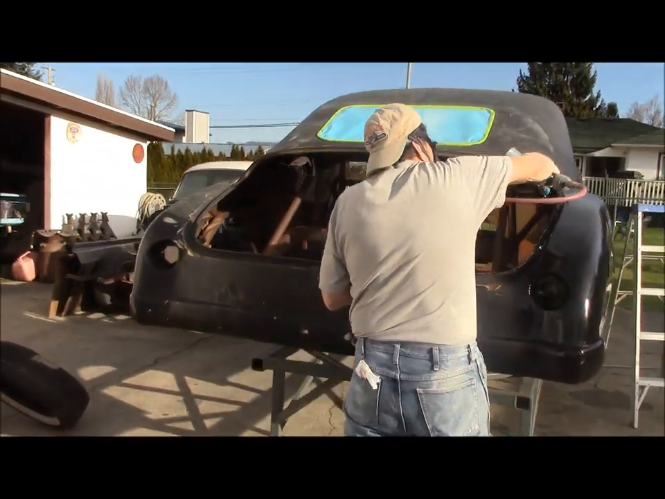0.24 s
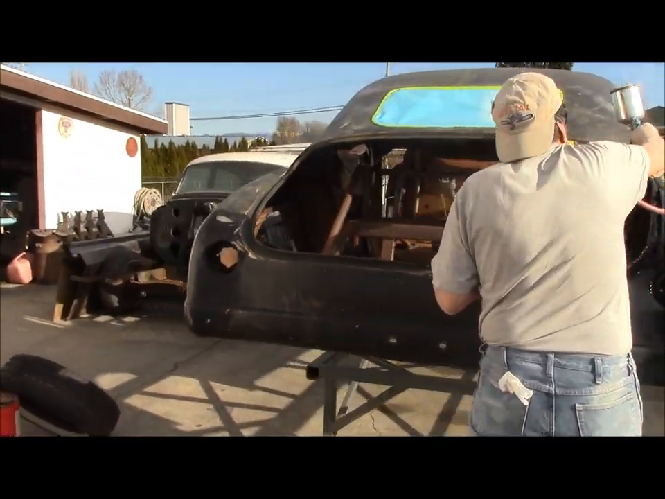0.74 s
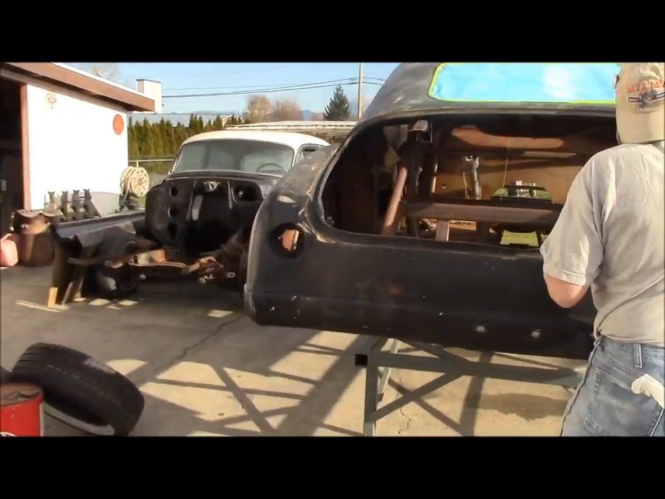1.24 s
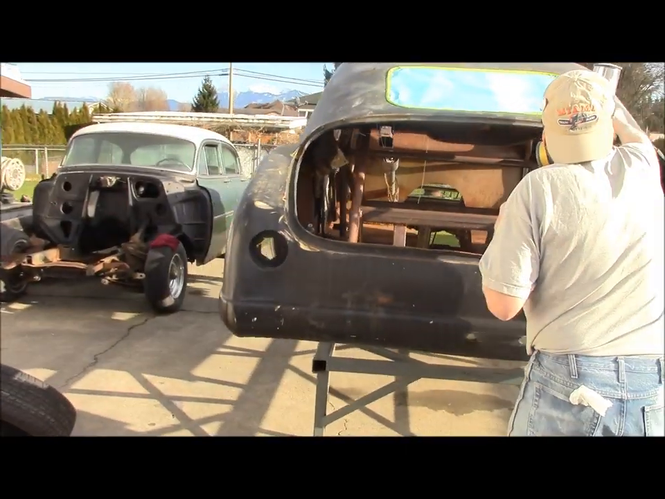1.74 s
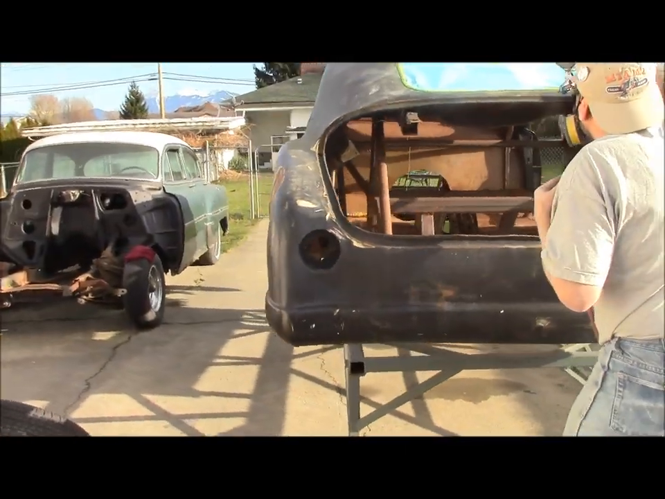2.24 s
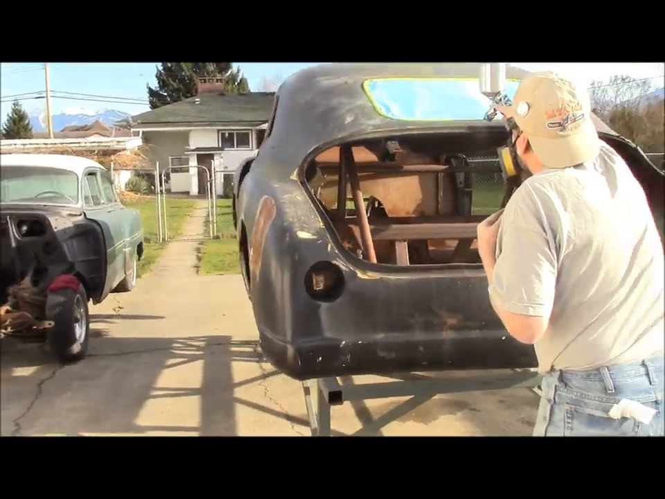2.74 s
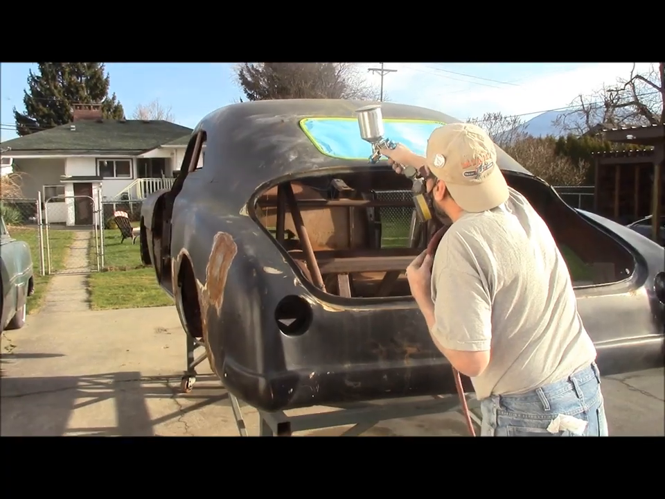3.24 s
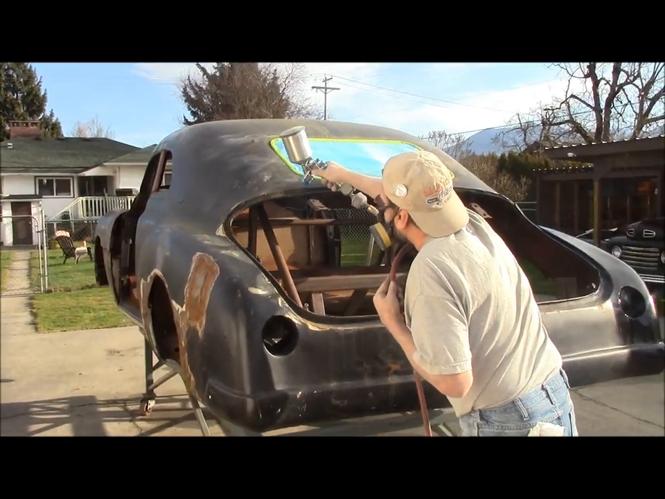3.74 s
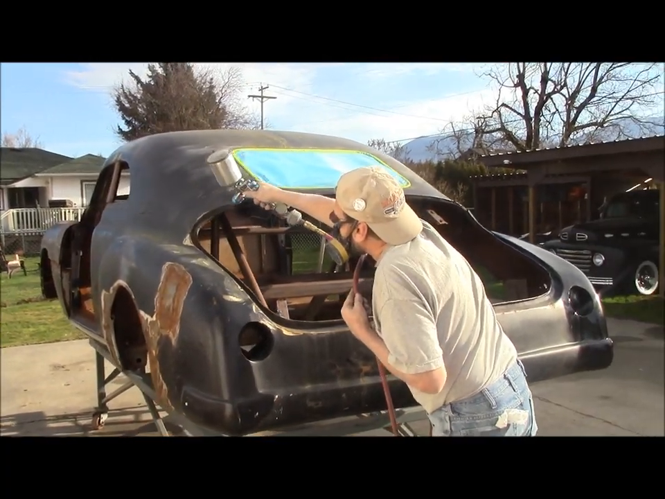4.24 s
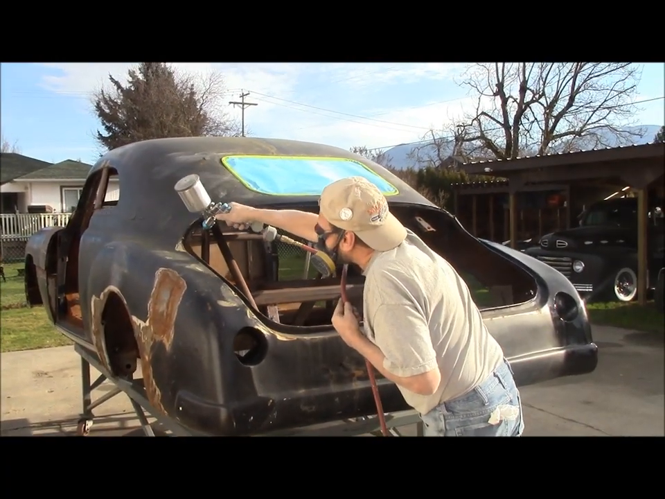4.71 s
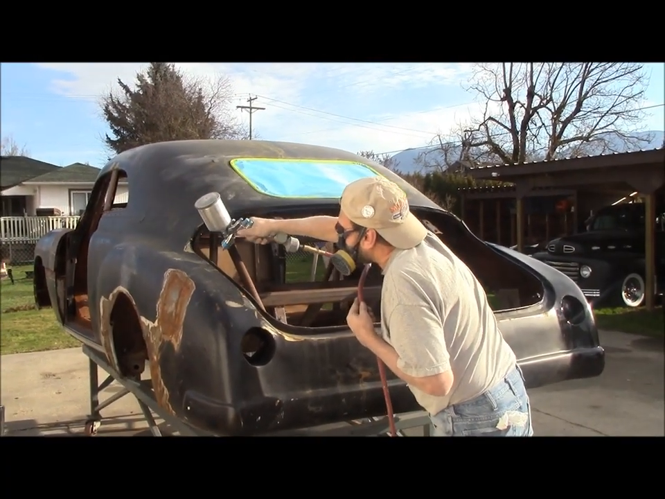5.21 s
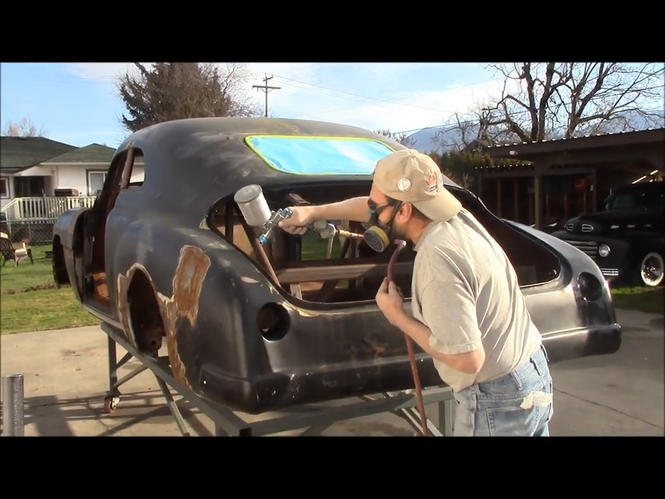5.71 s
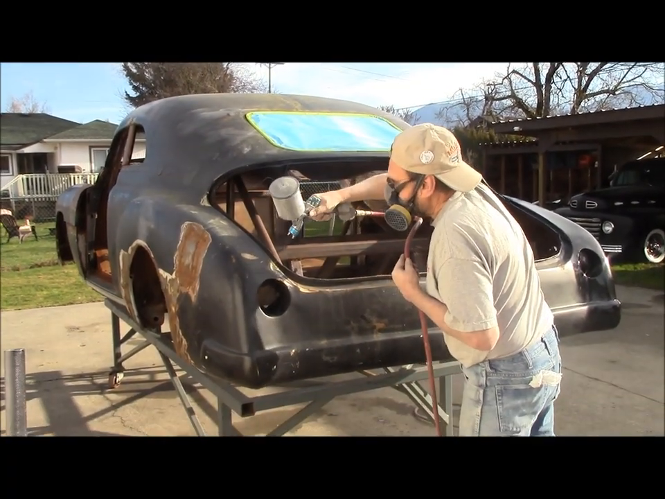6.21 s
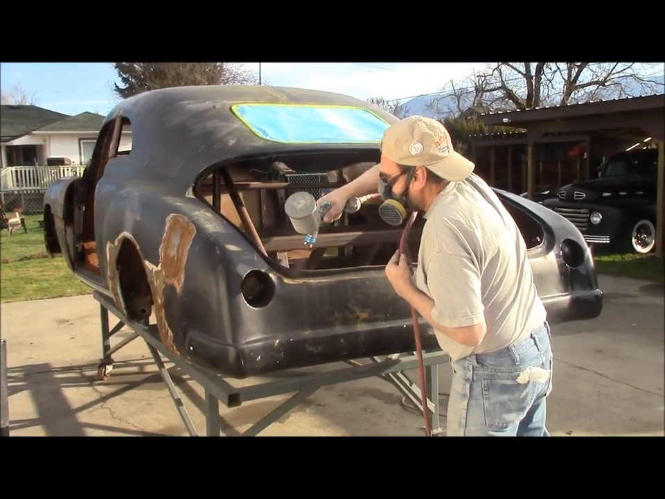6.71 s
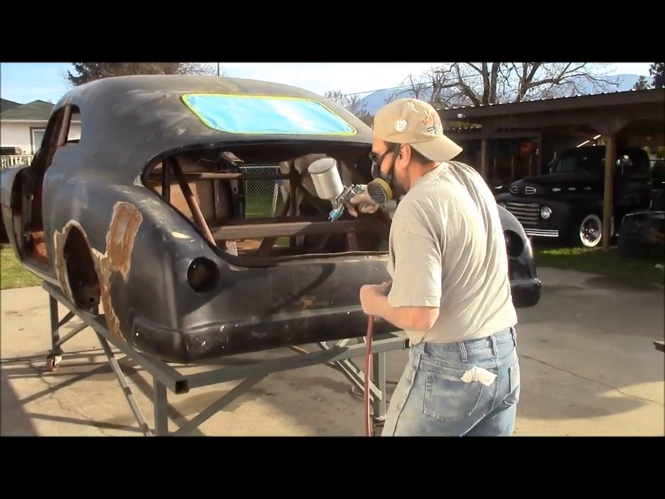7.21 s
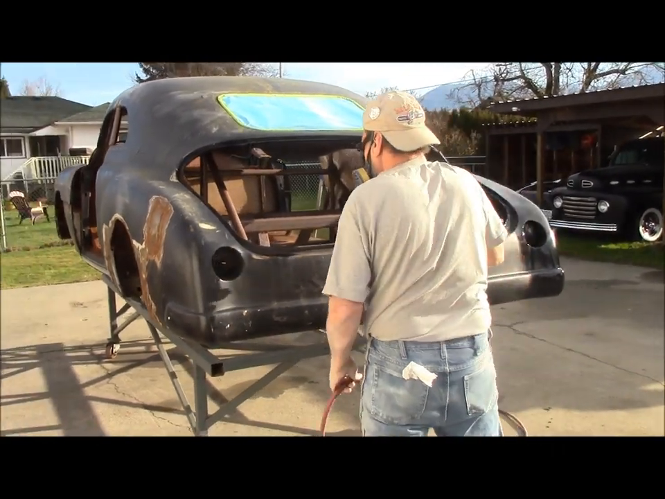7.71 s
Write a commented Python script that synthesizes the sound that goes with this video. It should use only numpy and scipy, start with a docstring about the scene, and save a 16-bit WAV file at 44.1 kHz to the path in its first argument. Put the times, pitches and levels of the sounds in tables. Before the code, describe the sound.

Outdoors, an air-fed spray gun hisses, pauses briefly, then hisses on and grows much louder before snapping off, over a droning compressor and early wind puffs.

```python
"""Spray painting in an open yard

An air-fed spray gun paints a car shell; the trigger is let go twice. Its hiss is filtered noise, with echoes off
the steel panels as the gun moves. A compressor drones behind it: sine tones plus a clatter repeated each stroke.
After a slight dip the gun, compressor, open air and a roar like a nearing vehicle grow louder together.
Puffs of wind flutter the microphone at first (short dull pops); shoes scuff on concrete (noise), with one squeak."""
import sys
import numpy as np
from scipy import signal
from scipy.fft import rfft, irfft
from scipy.io import wavfile
from scipy.ndimage import map_coordinates

SR = 44100
rng = np.random.default_rng(int(sys.argv[2]) if len(sys.argv) > 2 else 0)


def persist_wave(psi):
    """Save psi, clipped to +-1, as 16-bit WAV."""
    counts = np.round(np.clip(psi, -1, 1) * 32767).astype(np.int16)
    wavfile.write(sys.argv[1], SR, np.atleast_2d(counts).T)


N = 351036  # samples
TIME = np.arange(N) / SR  # s
FREQS = np.maximum(np.fft.rfftfreq(N, 1 / SR), 1)  # Hz


def undb(db):
    """Turn decibels into a plain multiplier."""
    return 10 ** (np.asarray(db) / 20)


def unit(x):
    """Scale to an average (rms) level of 1."""
    return x / np.sqrt(np.mean(x ** 2))


def curves(rows):
    """Join each column of a table by straight lines in time; the first column is the time."""
    times, *columns = np.transpose(rows)
    return [np.interp(TIME, times, column) for column in columns]


def colour(points):
    """Multiplier at every frequency, joined up from (f/Hz, level/dB) points."""
    hz, db = np.transpose(points)
    return undb(np.interp(np.log(FREQS), np.log(hz), db))


def resonance(hz, width):
    """Response of something that rings at one pitch, 1 at its centre."""
    return 1 / (1 + 1j * (FREQS ** 2 - hz ** 2) / (FREQS * width))


def above(hz, order=8):
    """Response that keeps what lies above hz; a higher order cuts more steeply."""
    return 1 / np.sqrt(1 + (hz / FREQS) ** (2 * order))


def shape(x, response):
    """Filter a sound by a frequency response."""
    return irfft(rfft(x) * response, N)


def noise(response):
    """Random noise coloured by a response, at rms 1."""
    spectrum = rng.standard_normal(2 * len(FREQS)).view(complex)
    return unit(irfft(response * spectrum, N))


def walk(rate):
    """A smooth random curve of spread 1 that turns about rate times a second."""
    return noise(np.exp(-(FREQS - 1) / rate))


def delayed(x, ms):
    """The sound after a path whose length may change."""
    fine = signal.resample_poly(x, 2, 1)
    positions = 2 * (np.arange(N) - ms * SR / 10 ** 3)
    return map_coordinates(fine, [positions], order=3, mode="mirror")


def spread(mid, side):
    """Make left and right from what they share and what sets them apart."""
    return np.array([mid + side, mid - side])


# Trigger pulls: opens t/s, closes t/s, relative level/dB, extra level of the stored hose pressure/dB
PULLS = [(-.5, 0.659, -0.5, 2), (1.116, 7.23, 0, 11)]


def trigger(open_s=0.0045, close_s=0.011, bleed_s=0.037, spit_db=-2, spit_s=0.0045):
    """Air flow: the valve spits as it cracks, then opens on a full hose whose surplus pressure bleeds away."""
    flow, spit_lead_s = 0, .0185
    for start, stop, db, surge_db in PULLS:
        age = np.maximum(TIME - start, 0)
        opening = 1 - np.exp(-age / open_s)
        closing = np.exp(-np.maximum(TIME - stop, 0) / close_s)
        cracked = np.maximum(TIME - start + spit_lead_s, 0) / spit_s
        spit = undb(spit_db) * 2 * cracked * np.exp(-cracked ** 2)
        pressure = undb(db + surge_db / (1 + (age / bleed_s) ** 3))
        flow = flow + spit + opening * closing * pressure
    return flow


# Colour of the jet's noise: f/Hz, relative level per Hz/dB
JET_COLOUR = [(650, -18), (1100, -11.5), (1550, -11), (2400, -4.5), (3150, -5), (3600, -3.5), (4250, -6),
              (5300, -3.5), (6500, -1.6), (8300, -4.5), (9200, -3), (10400, -3), (12300, -7),
              (13700, -11.7), (15100, -16)]
# Shared loudness of gun, compressor, open air and roar: t/s, level/dB
SWELL = [(.2, -33.5), (.62, -34.5), (1.3, -36.5), (4.49, -24), (4.55, -22.5), (5.06, -21.5), (5.18, -20),
         (5.47, -19), (6.05, -14), (6.66, -14), (6.79, -14.5), (7.2, -13)]
# How squarely the nozzle is heard, poorly while the painter's back is in the way:
# t/s, level of the beamed treble before the whole jet is evened out/dB
AIM = [(.3, -2), (.65, -0.5), (1.8, -3), (2.45, 2.5), (4.5, 3), (5.25, 5), (5.55, 4), (6.1, 3.5), (6.85, 1),
       (7.2, 4)]
# Low rush under the hiss, strongest as the jet blows across the rim: t/s, level before evening out/dB
RUSH = [(.3, -9), (1.4, -12), (2.6, -10.5), (3.8, -10.5), (4.6, -9), (5.2, -7.5), (5.6, -5), (5.9, -9.5),
        (6.25, -11.5), (6.7, -10), (7.2, -9.5)]
# Highest treble at the faintest moment (dB), and its change for each dB of swell: it lags as the jet grows
HIGHEST_DB, HIGHEST_PER_DB = 0.5, -0.0681


def jet(flutter_db=0.59, rush_hz=3400, beam_hz=8500, shade_hz=12800):
    """Churning air at the nozzle makes noise; the treble depends most on how the gun is aimed."""
    swell_db, aim = curves(SWELL)[0], undb(curves(AIM)[0])
    highest_db = HIGHEST_DB + HIGHEST_PER_DB * (swell_db - swell_db.min())
    spectrum = colour(JET_COLOUR) * above(510, order=2)
    upper, top = above(rush_hz, order=5), above(beam_hz, order=6)
    rush = noise(spectrum * np.sqrt(1 - upper ** 2)) * undb(curves(RUSH)[0])
    hiss = noise(spectrum * upper * np.sqrt(1 - top ** 2))
    beam = noise(spectrum * top)
    beam = beam + (undb(highest_db) - 1) * shape(beam, above(shade_hz, order=14))
    evened = (rush + hiss + aim * beam) / np.hypot(1, aim)
    return evened * undb(swell_db + flutter_db * walk(32)) * trigger()


def yard_echo(x, t60=0.3, dull_hz=7000):
    """Scattered returns from walls and parked cars, duller than the jet; they fade by 60 dB in t60 seconds."""
    t = TIME[:SR // 2]
    tail = rng.standard_normal(len(t)) * undb(-60 * t / t60) * (t > .008)
    tail = signal.lfilter(*signal.butter(1, min(dull_hz, .45 * SR), fs=SR), tail)
    return signal.fftconvolve(x, tail / np.linalg.norm(tail))[:N]


def scatter(x, count=3):
    """Many small curved surfaces add short echoes that come and go, so the colour keeps shifting."""
    out, t = 0, TIME[:SR // 200]
    for _ in range(count):
        echoes = rng.standard_normal(len(t)) * (t > .0008)
        out = out + walk(0.66) * signal.oaconvolve(x, echoes / np.linalg.norm(echoes))[:N]
    return out / np.sqrt(count)


# The gun closes on the rim of the window opening and draws back: t/s, lag of the rim's echo/ms, its strength (0-1)
RIM = [(2.6, .6, .03), (3.15, .59, .09), (3.5, .53, .03), (3.85, .428, .11), (4.12, .387, .33),
       (4.28, .32, .12), (4.45, .276, .36), (4.62, .227, .2), (4.8, .182, .38), (5, .136, .26),
       (5.3, .122, .48), (5.55, .105, .31), (5.7, .12, .34), (5.92, .184, .3), (6.1, .255, .07),
       (6.3, .313, .13), (6.8, .312, .03), (7.2, .306, .18)]


def closeness():
    """How near the gun is to the rim, 1 at the closest point: a shorter echo lag means nearer."""
    rim_ms = curves(RIM)[0]
    return rim_ms.min() / rim_ms


# The wrist turns the paint cup into and out of the sound's path: t/s, lag of the cup's echo/ms, strength (0-1)
CUP = [(0, .199, .14), (.6, .195, .08), (1.3, .212, .13), (2, .28, .07), (2.4, .18, .05), (3.1, .23, .06),
       (4.1, .224, .09), (4.5, .13, .02), (4.65, .103, .12), (4.9, .139, .1), (5.3, .135, .19),
       (5.52, .15, .17), (5.8, .136, .07), (6.5, .141, .06), (6.85, .132, .23), (7.2, .138, .18)]
# Panel echo: lag (ms) = PANEL_MS + PANEL_PER_RIM * rim lag; its strength is PANEL_SHARE at the closest point
PANEL_MS, PANEL_PER_RIM, PANEL_SHARE = 2.07, 2, .15
# Yard echo at the faintest moment (dB); the direct hiss gains on it by this many dB for each dB of swell
YARD_ECHO_DB, YARD_FALL_PER_DB = -11.5, 0.36
# The treble drifts from slightly right to slightly left: left-right difference (dB), midpoint and pace (s)
PAN_DB, PAN_CROSS_S, PAN_S = .55, 3.4, 1.2


def spray_gun(gun_db=0.4, side_db=-11.0, rim_hz=6900, cup_hz=3500):
    """Echoes from the shell cancel and boost pitches as the gun travels; only the treble is spread in stereo."""
    rim_ms, rim_share = curves(RIM)
    cup_ms, cup_share = curves(CUP)
    swell_db = curves(SWELL)[0]
    direct = jet()
    # the narrow rim returns only short waves, upside down
    mid = direct - rim_share * delayed(shape(direct, above(rim_hz, order=2)), rim_ms)
    mid = mid + cup_share * delayed(shape(direct, above(cup_hz, order=2)), cup_ms)
    panel_ms = PANEL_MS + PANEL_PER_RIM * rim_ms
    mid = mid + PANEL_SHARE * np.sqrt(closeness()) * delayed(direct, panel_ms)
    mid = mid + .17 * scatter(direct)
    to_yard = direct * undb(YARD_FALL_PER_DB * (swell_db.min() - swell_db))
    mid = mid + undb(YARD_ECHO_DB) * yard_echo(to_yard)
    treble = above(4200, order=18) * np.sqrt(1 - above(14000, order=10) ** 2)
    lean = undb(PAN_DB * np.tanh((TIME - PAN_CROSS_S) / PAN_S) / 2) - 1
    side = shape(undb(side_db) * jet() + lean * mid, treble)
    return undb(gun_db) * spread(mid, side)


# A thin leak of air: f/Hz, relative level per Hz/dB
LEAK = [(2000, -10), (5000, -4), (7000, 3), (9800, -11), (11200, -7), (12200, -2.5), (13500, -14),
        (15500, -12)]
LEAK_DB = -55


def leak():
    """The valve does not quite seat after the last pull, so a faint hiss goes on."""
    after_last_pull = TIME > PULLS[-1][1]
    return undb(LEAK_DB) * noise(colour(LEAK) * above(2000, order=2)) * after_last_pull


STROKE_HZ = 13.936  # average compressor stroke rate
# The three main tones swell and fade as one walks through their standing waves:
# t/s, low level/dB, middle level/dB, high level/dB (relative)
HUM = [(0, -4, 4, -9), (.6, -5, 8, -3), (1, 0, -7, 0.5), (1.7, 0.5, -9, 2), (2.2, -10, -1, .5),
       (2.7, -19, -2.5, 0), (3.6, -7.5, -1.5, -2), (4.4, -5.5, -3, -.5), (5.4, -20, -1, -2.5),
       (6, -10, -2.5, -8), (7.05, -11, 0, 0), (7.6, -7, 2, -5)]
# Pitches of the main tones: multiples of the stroke rate
HUM_MULTIPLES = (24, 28, 66)
# Weaker tones, whose balance shifts as one walks, a row for each tone:
# relative level at the start/dB, relative level once the walk is over/dB
TONES = [(-26, -8), (-21, -9), (-10, -10), (-1, -15.5), (-7, -27), (6.5, -16)]
# Pitches of the weaker tones: multiples of the stroke rate
TONE_MULTIPLES = (25, 29, 35, 59, 63, 68)
# Ringing of the compressor's casing and intake: f/Hz, width/Hz, relative level/dB
CASING = [(334, 32, -0.5), (393, 50, 1), (822, 110, 0), (920, 62, 5), (1690, 150, -18), (2480, 130, -18)]


def compressor(waver_db=1, tone_db=-1.0, clatter_db=-6.0, rush_db=-7.5, walk_s=6.0):
    """Every stroke repeats the same clatter in the casing; a few multiples of the stroke rate sing out."""
    turns = STROKE_HZ * np.cumsum(1 + 0.00055 * walk(2.6)) / SR  # strokes so far
    moved = np.minimum(TIME / walk_s, 1)
    levels = curves(HUM) + [first_db + (last_db - first_db) * moved for first_db, last_db in TONES]
    tones = 0
    for multiple, db in zip(HUM_MULTIPLES + TONE_MULTIPLES, levels):
        cycles = multiple * turns + rng.random() + 0.093 * walk(1.2)
        tones = tones + undb(db + waver_db * walk(1.5)) * np.sin(2 * np.pi * cycles)
    casing = sum(undb(db) * resonance(hz, width) for hz, width, db in CASING)
    casing = casing * above(230, order=2) * (1 - above(3200, order=8))
    stroke = rng.standard_normal(SR // 14)
    repeated = np.interp(turns % 1, np.linspace(0, 1, len(stroke)), stroke)
    clatter = unit(shape(repeated, casing))
    return undb(tone_db) * np.sqrt(2) * tones + undb(clatter_db) * clatter + undb(rush_db) * noise(casing)


# Shoe scuffs: t/s, length/s, level/dB, centre f/Hz, width/Hz (before a fixed widening)
SCUFFS = [(0.361, 0.014, -38.5, 1330, 300), (0.346, 0.088, -41, 2880, 380), (.38, 0.086, -45, 1090, 900),
          (1.987, 0.063, -39, 1710, 1800), (2.062, 0.042, -46, 1300, 1700), (3.273, 0.076, -47, 1200, 1700),
          (7.574, 0.052, -41, 3530, 3500), (7.852, 0.038, -36, 4170, 3000),
          (7.882, 0.05, -36.5, 3060, 2600), (7.919, .07, -37, 3000, 2700)]


def scuffs(grit_db=3.0):
    """Soles grind grit on the concrete in short rasps: uneven noise that rises and falls with each stroke."""
    out = 0
    unevenness = np.repeat(rng.standard_normal(N // 64 + 1), 64)[:N]
    grit = rfft(rng.standard_normal(N) * undb(grit_db * unevenness))
    for start, length, db, hz, width in SCUFFS:
        stroke = np.sin(np.pi * np.clip((TIME - start) / length, 0, 1))
        rasp = unit(irfft(grit * resonance(hz, 1.6 * width) ** 2, N))
        out = out + undb(db) * stroke * rasp
    return out


# Grains of grit that crack under a sole: t/s, peak level/dB, centre f/Hz
CRACKS = [(7.853, -22, 8500), (7.8547, -27, 3000), (7.865, -28, 5000), (7.8677, -25, 6000),
          (7.8707, -17, 3180), (7.903, -30, 6000), (7.9368, -33, 5000), (7.9385, -28, 7000),
          (7.95, -29, 5500)]


def cracks(ring_s=0.001):
    """Single grains give way with a dry tick: a tiny fading burst of noise around one pitch."""
    out = 0
    for start, db, hz in CRACKS:
        burst = rng.standard_normal(N) * (TIME >= start) * np.exp(-np.abs(TIME - start) / ring_s)
        tick = signal.lfilter(*signal.iirpeak(hz, 1.8, fs=SR), burst)
        out = out + undb(db) * tick / np.abs(tick).max()
    return out


# One faint squeak; its rise is a share of the starting pitch
SQUEAK_S, SQUEAK_LENGTH_S, SQUEAK_HZ, SQUEAK_RISE, SQUEAK_DB = 3.258, .085, 525, .45, -51.5


def squeak():
    """A short, rough tone that bends upward, with an unsteady pitch and level."""
    progress = np.clip((TIME - SQUEAK_S) / SQUEAK_LENGTH_S, 0, 1)
    wobble, rough = 1 + .12 * walk(140), 1 + .5 * walk(110)
    hz = SQUEAK_HZ * (1 + SQUEAK_RISE * progress ** 3) * wobble
    tone = np.sin(2 * np.pi * np.cumsum(hz) / SR)
    return np.sqrt(2) * undb(SQUEAK_DB) * rough * np.sin(np.pi * progress) * tone


# Wind puffs on the microphone, and in the last row one faint low footfall played the same way: t/s, level of
# the first pop before filtering/dB, f/Hz, length/s
PUFFS = [(0.189, -32, 280, 0.0033), (.195, -25, 240, 0.0089), (0.218, -23, 217, 0.012),
         (0.244, -28, 250, 0.0033), (0.257, -26.5, 290, 0.0096), (0.285, -25, 260, 0.0037),
         (.301, -26, 258, 0.0026), (0.308, -24, 300, 0.0039), (0.321, -25, 280, 0.0043),
         (0.34, -33, 240, 0.0028), (0.359, -31, 248, 0.055), (.576, -33, 370, 0.0036),
         (.589, -28.5, 696, 0.0036), (0.592, -32, 300, .003), (.603, -28.5, 340, .013),
         (0.626, -34, 270, 0.0033), (0.642, -41, 420, 0.022), (.679, -22, 284, 0.0029),
         (0.69, -31, 283, 0.0085), (.71, -29, 300, 0.011), (.724, -35, 270, 0.016),
         (0.781, -37, 280, 0.036), (.878, -30, 676, 0.0045), (0.881, -30.5, 297, 0.0025),
         (0.908, -34, 290, 0.0034), (.913, -30.5, 294, 0.0053), (.967, -44, 307, 0.02),
         (1.035, -39, 240, .01), (1.052, -35, 280, 0.0107), (1.132, -28, 300, 0.012),
         (1.154, -29, 390, 0.013), (1.173, -31, 400, .02), (1.216, -35, 330, 0.013),
         (1.277, -36, 300, 0.015), (1.296, -28.5, 326, .025), (1.352, -41, 304, 0.029),
         (1.435, -40, 300, .015), (1.463, -34.5, 350, 0.028), (1.489, -30, 380, .0091),
         (1.511, -36, 310, 0.012), (1.536, -37, 750, .003), (1.56, -30.5, 357, 0.0078),
         (2.24, -51, 228, 0.13)]


def eddies(cycles=0.98, after_db=-6, eddy_rate=330, edge=0.087):
    """Each puff is a dull pop at the microphone's opening; longer ones add a quick run of weaker eddies. The
    faint footfall in the last row is played the same way."""
    out, t = np.zeros(N), TIME[:SR // 20]
    for start, db, hz, length in PUFFS:
        count = 1 + int(length * eddy_rate)
        for k, (when, detune, size) in enumerate(rng.random((count, 3))):
            later = k > 0  # the first pop is exact, the later eddies vary
            turns = t * hz * 2 ** (later * 2.1 * (detune - .5))
            wave = np.sin(2 * np.pi * turns) + edge * np.sin(4 * np.pi * turns)
            age = 2 * turns / cycles
            pop = wave * age * np.exp(1 - age)
            i = int((start + later * when * length) * SR)
            out[i:i + len(t)] += pop * undb(db + later * (after_db - 1.1 * size))
    return shape(out, above(153, order=3))


def wind(puff_db=0, side_db=-14, rumble_db=-46, dying_db=-15):
    """Puffs over a soft rumble that dies away; the two openings feel slightly different eddies."""
    end_s, gust_db = 1.58, 2.3
    fade_out = np.clip((end_s - TIME) / .05, 0, 1)
    breeze = undb(rumble_db + dying_db * TIME / end_s + gust_db * walk(8.9)) * fade_out
    rumble = breeze * noise(resonance(190, 370) ** 2 * above(77, order=2))
    side = undb(side_db) * shape(eddies(), above(930, order=2))
    return spread(undb(puff_db) * eddies() + rumble, side)


# Colour of the open air: f/Hz, relative level per Hz/dB
AIR = [(25, -38), (60, -26), (105, -9.5), (220, -4.5), (400, 3), (620, -3), (790, -7.5), (980, 4.5),
       (1130, -4.5), (1350, -2), (1530, -9), (1720, -1), (2000, -4), (2480, -3), (2660, -10), (2850, -9.5),
       (3900, -13.5), (5500, -20.5), (9000, -28), (12400, -35), (14000, -44)]
AIR_DB = -23.5  # relative to the swell, before the breeze and lull
# The air is breezy at first, then falls into a lull
LULL_S, LULL_WIDTH_S, LULL_DB, BREEZE_DB, BREEZE_S = 3.17, 0.38, -4.5, 7.5, 2.16


def open_air(side_db=-11):
    """Soft noise of the open yard, whose treble comes from all round."""
    side = undb(side_db) * shape(noise(colour(AIR)), above(4000, order=8))
    breeze_db = BREEZE_DB / (1 + (TIME / BREEZE_S) ** 10)
    lull_db = LULL_DB * np.exp(-((TIME - LULL_S) / LULL_WIDTH_S) ** 2)
    return spread(noise(colour(AIR)), side) * undb(AIR_DB + breeze_db + lull_db)


# Colour of the roar: f/Hz, relative level per Hz/dB
ROAR = [(50, -57), (100, -16), (230, -4), (480, -8.5), (610, 0), (690, -1.5), (790, 2.5), (880, 1.5),
        (1080, -8.5), (1300, -8.5), (2050, -28), (2450, -30), (2800, -26), (5000, -47), (15000, -52)]
# Levels relative to the swell: one vehicle nears over a far roar
TRAFFIC_DB, TRAFFIC_NEAREST_S, TRAFFIC_PASS_S, TRAFFIC_FAR_DB = -16, 7.63, 0.52, -33.5


def distant_roar():
    """Low noise that gets louder as the vehicle's distance shrinks, over a constant far roar."""
    vehicle = undb(TRAFFIC_DB) / np.hypot(1, (TIME - TRAFFIC_NEAREST_S) / TRAFFIC_PASS_S)
    return noise(colour(ROAR)) * np.hypot(vehicle, undb(TRAFFIC_FAR_DB))


COMPRESSOR_DB = -25  # relative to the swell


def background():
    """Compressor, open air and the distant roar all follow the swell."""
    together = undb(COMPRESSOR_DB) * compressor() + open_air() + distant_roar()
    return together * undb(curves(SWELL)[0])


def scene(scuff_side_db=-14):
    """The gun in front, the yard behind it, wind at the microphone."""
    shoes = spread(scuffs() + cracks(), undb(scuff_side_db) * scuffs())
    return spray_gun() + leak() + background() + wind() + shoes + squeak()


TOP_HZ = 15850  # almost nothing is kept above this


def record(dry):
    """The recorder rounds the highest peaks and cuts the top."""
    rounded = dry / (1 + (dry / .95) ** 8) ** (1 / 8)
    return signal.sosfilt(signal.ellip(10, .1, 80, TOP_HZ, fs=SR, output="sos"), rounded)


dry = scene()
out = record(dry)
persist_wave(out)
```